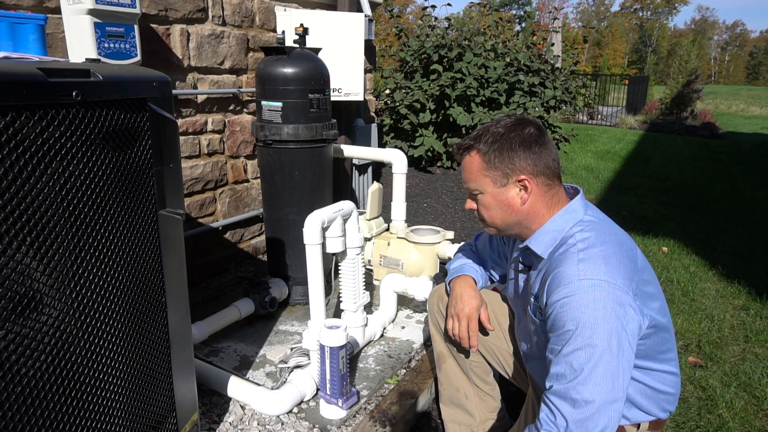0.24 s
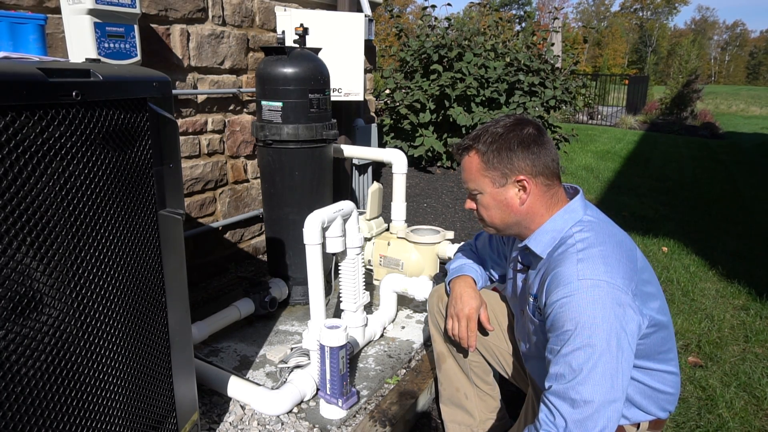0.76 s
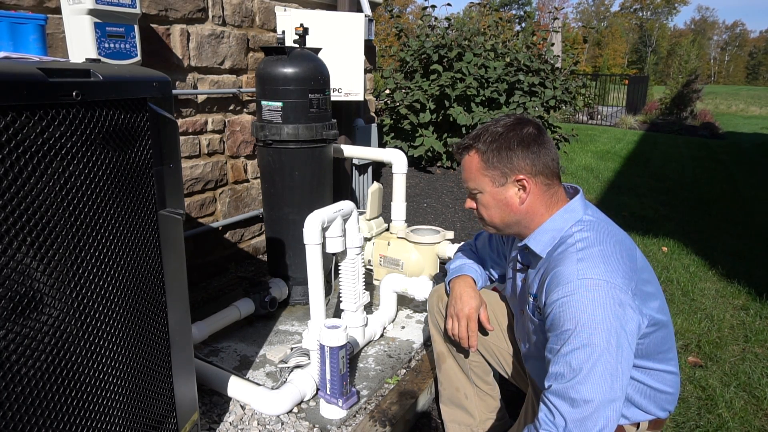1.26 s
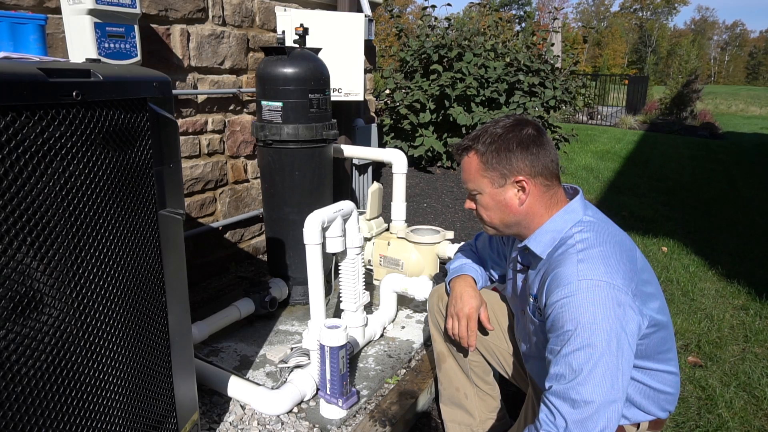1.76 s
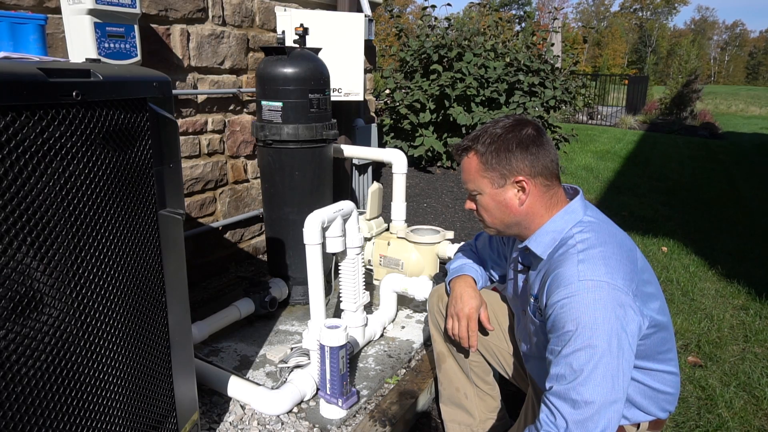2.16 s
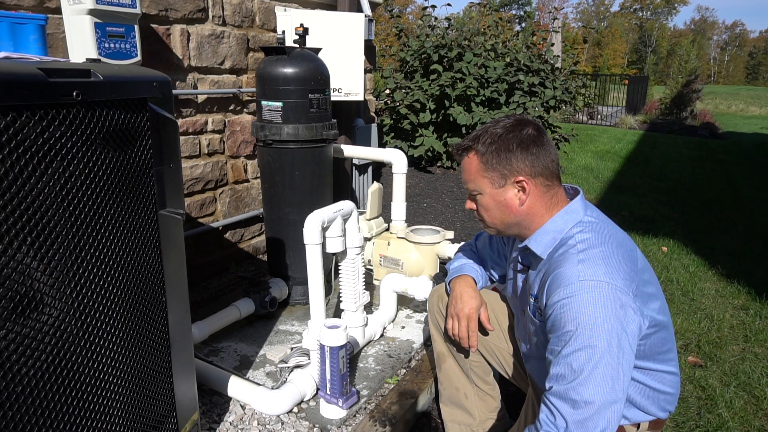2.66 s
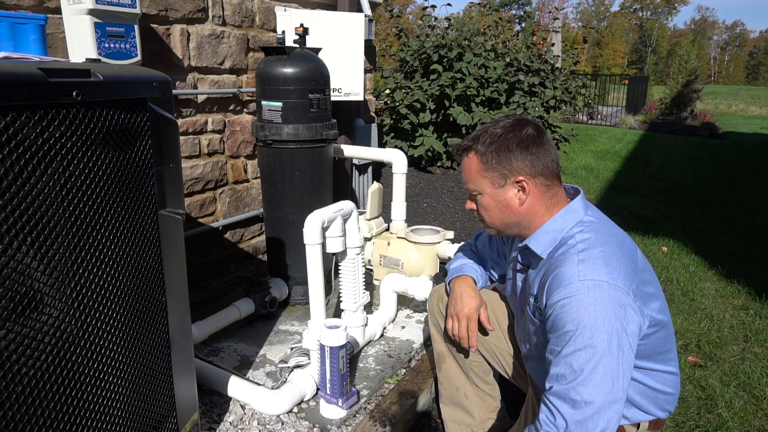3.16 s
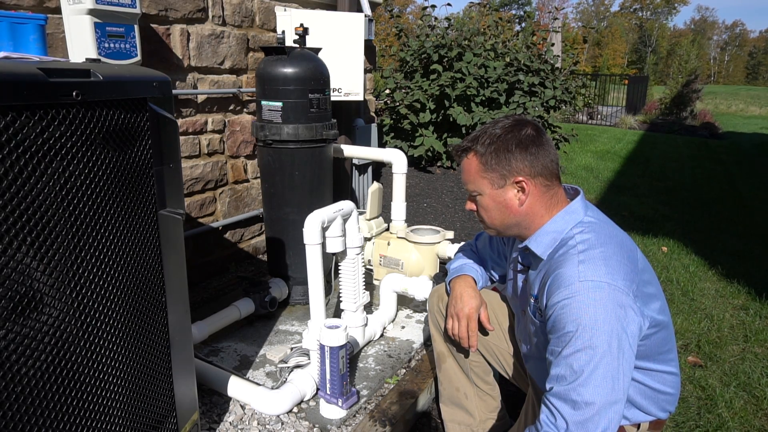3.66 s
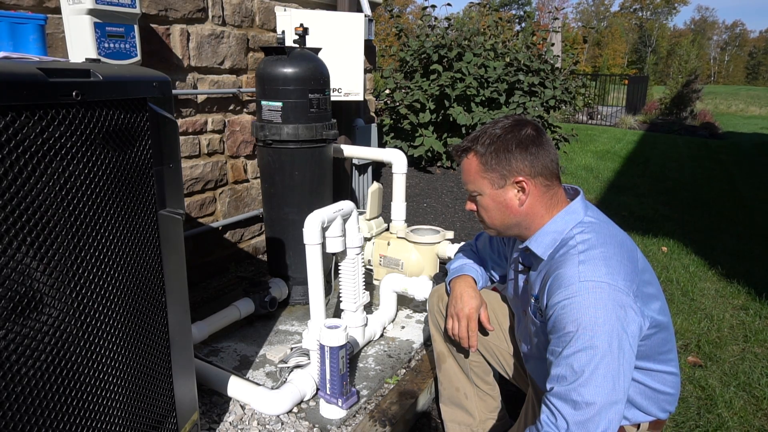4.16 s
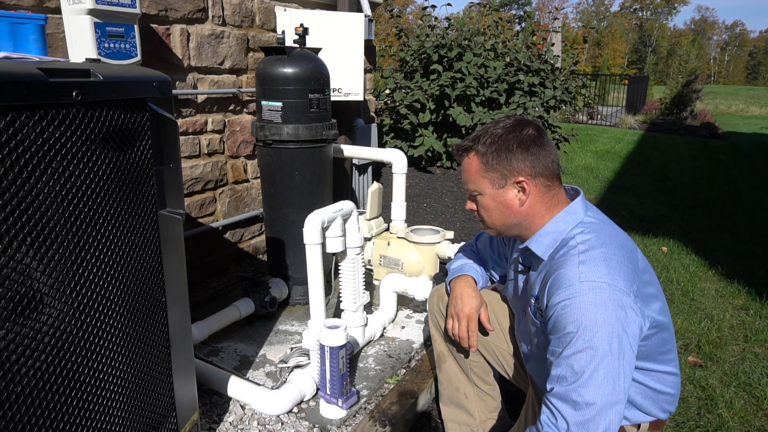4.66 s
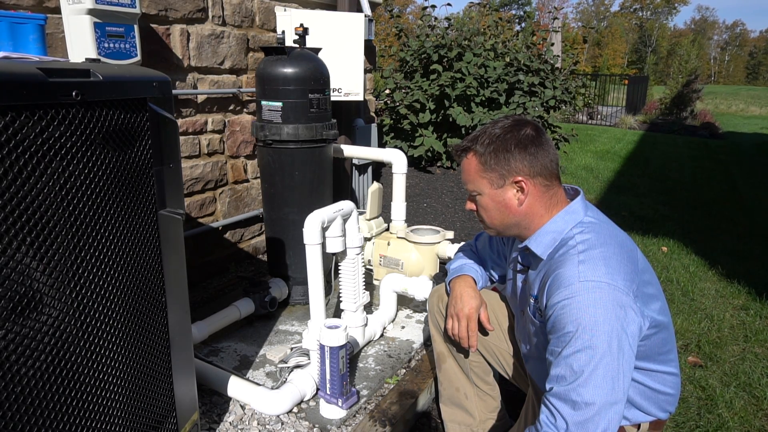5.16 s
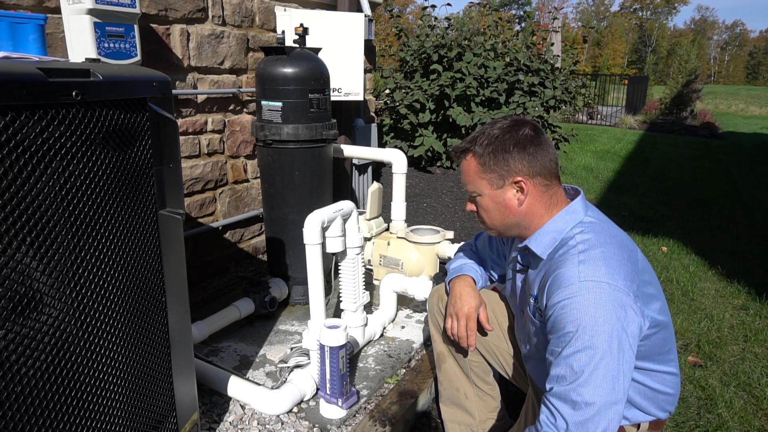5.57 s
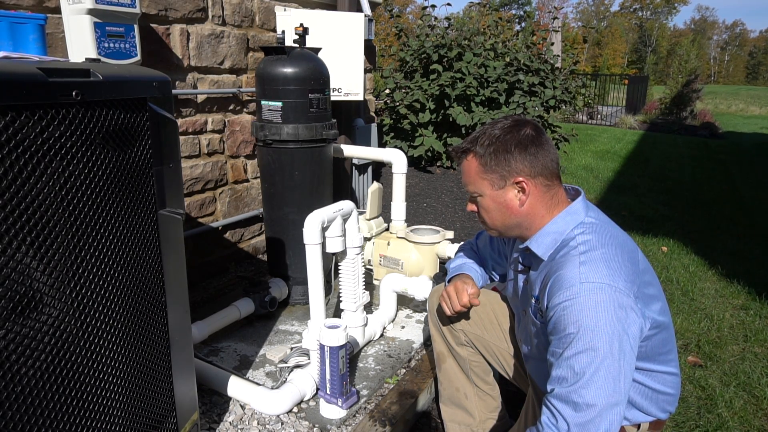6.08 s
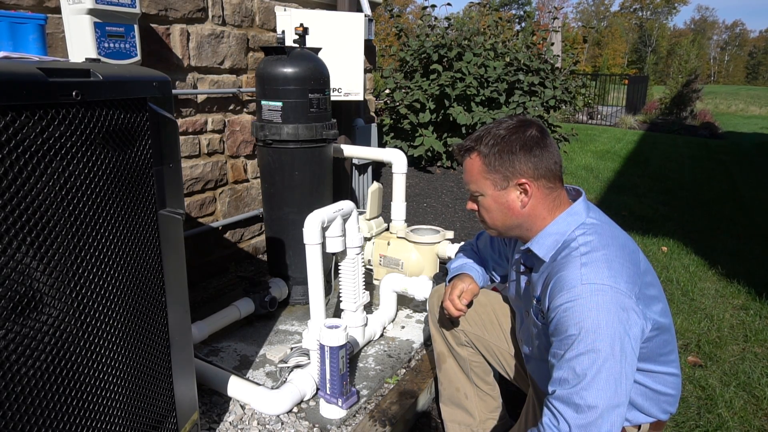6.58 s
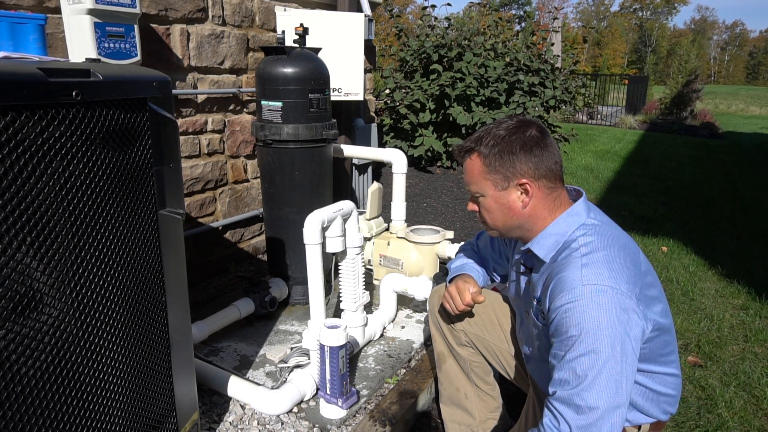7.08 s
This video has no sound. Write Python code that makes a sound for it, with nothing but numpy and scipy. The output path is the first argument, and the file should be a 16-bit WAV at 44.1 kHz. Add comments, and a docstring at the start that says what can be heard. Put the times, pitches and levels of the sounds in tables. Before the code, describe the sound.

From 0 s a pool pump is already running outdoors next to a stone wall, quiet at first. Its speed stays constant throughout: a strong buzzing hum around 300 Hz, with further singing tones near 600 Hz and thinner whines up to about 2 kHz, each wavering only slightly. Around them is a dense, hollow rush of cooling air and water, coloured by the housing, with softer hiss above and a faint very high electrical whine. Weak low drone lies beneath. The whole sound swells smoothly and evenly, clearly louder by the end at about 7.3 s, without any start, stop or change of pitch. Light wind rumbles low on the microphone, in soft gusts near 2.5, 4, 5.1, 5.8, 6.5 and 7.1 s, remaining below the machine. The pickup is close, with slight wall reflections and no speech.

```python
"""Outdoors beside a stone wall, a pool pump runs at constant speed and the whole sound fades up steadily.
Impeller and cooling fan sing as sines on multiples of the shaft speed, over a rush of air and water:
noise shaped by the resonances of the housing, its hiss scattered by the walls. Low sines make a drone,
the motor's drive adds a thin, very high whine of sidebands, and a light breeze rumbles on the
microphone as low noise that swells in gusts."""
import sys
import numpy as np
from scipy.fft import rfft, irfft, next_fast_len
from scipy.io import wavfile
from scipy.ndimage import map_coordinates

SR = 44100
rng = np.random.default_rng(int(sys.argv[2]) if len(sys.argv) > 2 else 0)


def unload_wav(signal):
    """Save mono or channel-first audio to the path in sys.argv[1] as 16-bit WAV at rate SR, clipped to [-1, 1]."""
    wavfile.write(
        sys.argv[1],
        SR,
        np.round(np.clip(np.atleast_2d(signal).T, -1, 1) * 32767).astype(np.int16),
    )


N = 323253  # length [samples]

SHAFT_HZ = 58.7015  # turns of the shaft per second


def amp(db):
    """Level to amplitude ratio: 20 dB is a factor of ten."""
    return 10 ** (np.asarray(db) / 20)


def unit(x):
    """Normalisation to rms 1, so that a later gain alone sets the level."""
    return x / np.sqrt(np.mean(x ** 2) + 1e-20)


def along(points, hz):
    """Spectral envelope: (frequency [Hz], level [dB]) points joined on a logarithmic frequency axis."""
    f, level_db = np.transpose(points)
    return np.interp(np.log(hz + 1), np.log(f), level_db)


def curve(rows):
    """Time envelope: (time [s], value) rows joined linearly, one value per sample."""
    return np.interp(np.arange(N) / SR, *np.transpose(rows))


def wobble(rate):
    """Slow random modulation: a smooth curve through normal random knots, rate of them a second."""
    knot_span = N / SR * rate
    coarse = np.linspace(0, knot_span, int(knot_span + 1) * 8)
    knots = rng.standard_normal(int(coarse[-1]) + 4)
    smooth = map_coordinates(knots, [coarse], mode="mirror")
    return np.interp(np.linspace(0, coarse[-1], N), coarse, smooth)


def filtered(x, gain):
    """Linear filtering: the spectrum of x times gain(Hz)."""
    m = next_fast_len(N + SR // 2)  # padded against wrap-around
    spectrum = rfft(x, m) * gain(np.fft.rfftfreq(m, 1 / SR))
    return irfft(spectrum, m)[:N]


def noise(colour):
    """Coloured noise: white noise filtered to the spectrum colour(Hz) in dB, at rms 1."""
    white = rng.standard_normal(N)
    return unit(filtered(white, lambda hz: amp(colour(hz))))


def tone(cycles):
    """Pure tone: a sine of rms 1 through the given cycles, from a random phase."""
    return np.sqrt(2) * np.sin(2 * np.pi * (cycles + rng.random()))


def breeze(t):
    """Wind noise on the microphone: low rumble swelling in bell-shaped gusts, broken into random puffs."""
    # Spectrum of the rumble: (frequency [Hz], relative density [dB per Hz])
    rumble_spectrum = [(8, -30), (20, -5), (40, 1), (80, -7), (200, -30), (800, -80)]
    # Gusts: (time of crest [s], length between the 1/e points of the rise [s], rise over the lull [dB])
    gusts = [(2.5, .8, 5), (3.95, 0.3, 8), (5.12, 0.7, 10), (5.76, 0.45, 8.5), (6.5, .4, 4), (7.12, .4, 11)]
    lull_db = -24.5  # between the gusts, re the fade
    puff_db, puffs_per_s = 2.0, 8  # eddies within the breeze: depth and rate
    gust_db = sum(rise_db * np.exp(-(2 * (t - crest) / length) ** 2) for crest, length, rise_db in gusts)
    level_db = lull_db + gust_db + puff_db * wobble(puffs_per_s)
    return amp(level_db) * noise(lambda hz: along(rumble_spectrum, hz))


def drone(t):
    """Structural vibration: weak low tones of the machine on its pad, each wavering slowly in level."""
    # Tones of the drone: (frequency [Hz], level re the fade [dB])
    drone_tones = [(35, -28.5), (59.1, -41), (95, -33), (120.5, -38)]
    return sum(amp(db + 2 * wobble(2.39)) * tone(hz * t) for hz, db in drone_tones)


def drive(t, wander_db=1.8, level_db=-1.0):
    """Modulation sidebands: windings sing around the switching rate, each sideband wandering in level."""
    # Sidebands of the switching whine: (sideband number, level before level_db [dB])
    whine_sidebands = [(-5, -57), (-4, -48), (-3, -58), (-2, -49), (-1, -51), (0, -46.5), (1, -50),
                       (2, -45), (3, -52.5), (5, -58)]
    switch_hz, field_hz = 14493.7, 60.25  # switching rate; field rate, twice which spaces the sidebands
    whine = np.zeros(N)
    for k, db in whine_sidebands:
        sideband_hz = switch_hz + 2 * k * field_hz
        whine += amp(db + wander_db * wobble(.8)) * tone(sideband_hz * t)
    return amp(level_db) * whine


def walls(x, echo_db=-23, spread=.016, count=14):
    """Comb filtering: weak early echoes off stone wall, slab and tanks ripple the spectrum finely."""
    delays = (rng.uniform(.001, spread, count) * SR).astype(int)  # up to spread [s], in samples
    echoes = sum(rng.choice([-1, 1]) * np.pad(x, (d, 0))[:N] for d in delays)
    return x + amp(echo_db) * echoes


def housing(hz):
    """Resonance: housing and pipes lift or hollow the spectrum in bell-shaped bands, summed in dB."""
    # Resonances (+) and hollows (-): (centre [Hz], full width at half the lift [Hz], lift [dB])
    resonances = [(183, 21, -1.5), (358, 66, 3), (416, 31, -3), (533, 110, 5.5), (702, 45, -5),
                  (808, 163, 8), (1038, 34, 3.5), (1170, 52, -7.5), (1229, 114, 10.5), (1360, 59, -2.5),
                  (1770, 200, 2), (1955, 98, 6.5), (2440, 90, 2.5), (2610, 50, 5), (3015, 86, 7),
                  (3455, 83, 5), (3570, 53, 3.5)]
    return sum(db / (1 + (2 * (hz - centre) / width) ** 2) for centre, width, db in resonances)


def flow(turns, level_db=-4.0, throb=0.028, split_hz=2400, shimmer_db=0.38):
    """Turbulence noise through resonances: a body throbbing once a turn and a hiss scattered by the walls."""
    # Turbulence of cooling air and water: (frequency [Hz], relative density [dB per Hz])
    turbulence = [(8, -40), (18, -16), (90, -0.5), (180, -2), (300, 0.5), (700, 0), (1400, -4),
                  (2100, -6.5), (2900, -17.5), (4700, -18.5), (6900, -26), (8600, -25.5), (12000, -33),
                  (15500, -41)]
    rush = noise(lambda hz: along(turbulence, hz) + housing(hz))
    body = filtered(rush, lambda hz: 1 / (1 + (hz / split_hz) ** 8))
    hiss = walls(rush - body) * amp(shimmer_db * wobble(25))
    throbbing_body = body * (1 + throb * tone(turns))
    return amp(level_db) * (throbbing_body + hiss)


def rotor(turns, flutter_db=0.18):
    """Blade-passing tones: blades pass fixed edges; uneven inflow makes each tone drift and flutter."""
    # Tones of the rotor, among them 5, 10 and 11 strongest: (multiple of shaft speed, level re the fade [dB])
    rotor_tones = [(5, -9), (6, -25), (7, -42), (9, -35), (10, -7), (11, -10), (14, -21), (15, -12),
                   (18, -28), (21, -27), (22, -15.5), (23, -34), (25, -28), (26, -23.5), (27, -49),
                   (28, -48), (29, -27.5), (30, -16.5), (31, -19.5), (33, -29.5), (34, -45), (35, -29.5),
                   (40, -28), (45, -26), (47, -38.5), (52, -48), (61, -50), (65, -40), (85, -56), (90, -44),
                   (100, -52)]
    drift_db, drifts_per_s = 0.43, 1.49  # slow swelling and sinking: depth and rate
    unsteady_order, unsteady_db = 11, 1.1  # this multiple and its overtones drift further
    sound = np.zeros(N)
    for k, db in rotor_tones:
        depth_db = drift_db if round(k) % unsteady_order else unsteady_db
        level_db = db + depth_db * wobble(drifts_per_s) + flutter_db * wobble(14)
        sound += amp(level_db) * tone(round(k) * turns)
    return sound


def scene():
    """Superposition: breeze and pump, held at one speed, add up under a common fade."""
    # Fade-up of the whole scene, even in decibels: (time [s], level [dB])
    fade = [(0, -30), (7.33, -18.5)]
    t = np.arange(N) / SR
    turns = SHAFT_HZ * t
    pump = drone(t) + drive(t) + flow(turns) + rotor(turns)
    return (amp(curve(fade)) * (breeze(t) + pump))[None]


def record(dry):
    """Band limiting: an ideal low-pass keeps nothing from the limit upward."""
    top_hz = 15720
    return np.array([filtered(channel, lambda hz: hz < top_hz) for channel in dry])


dry = scene()
out = record(dry)
unload_wav(out)
```